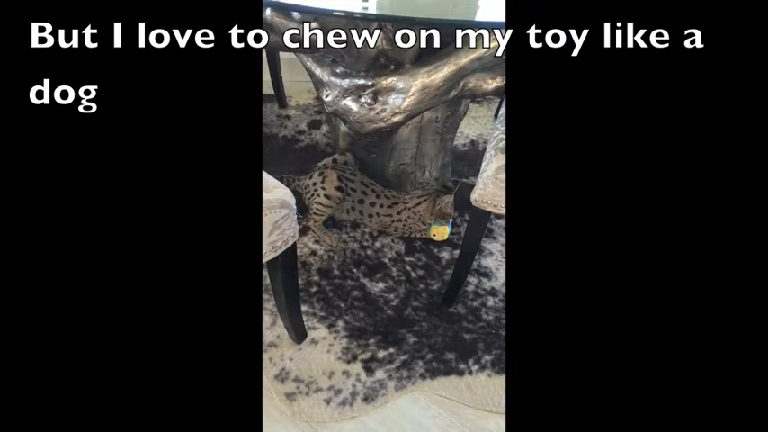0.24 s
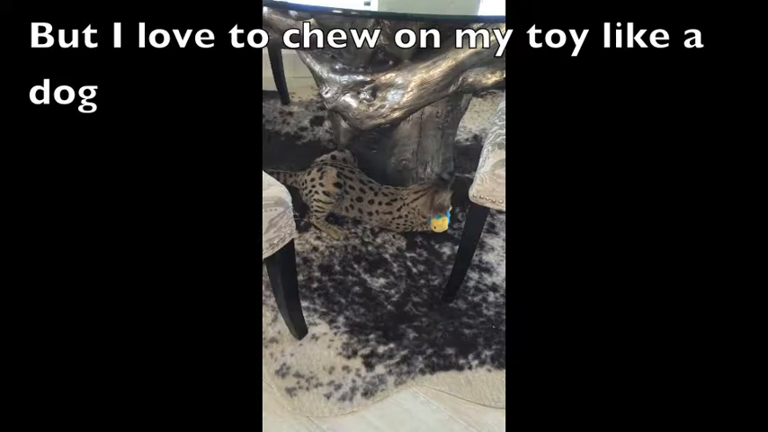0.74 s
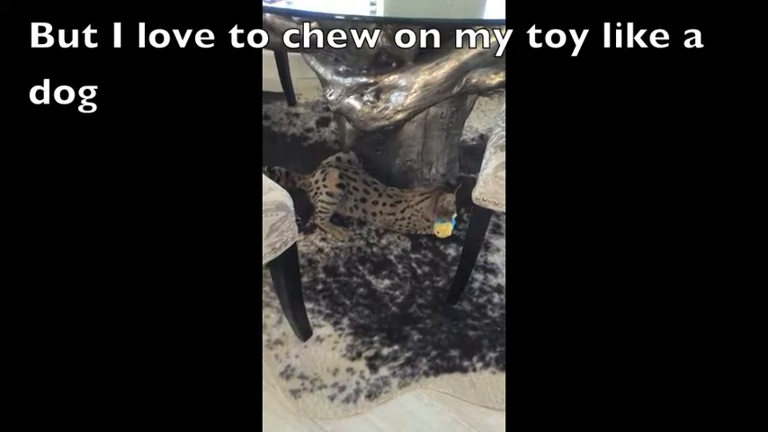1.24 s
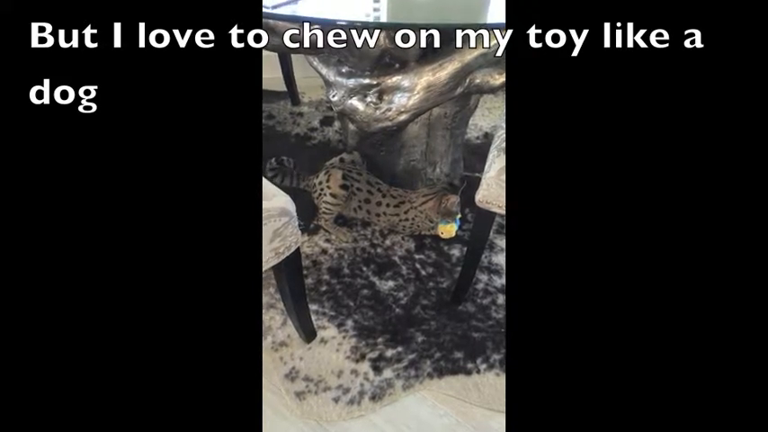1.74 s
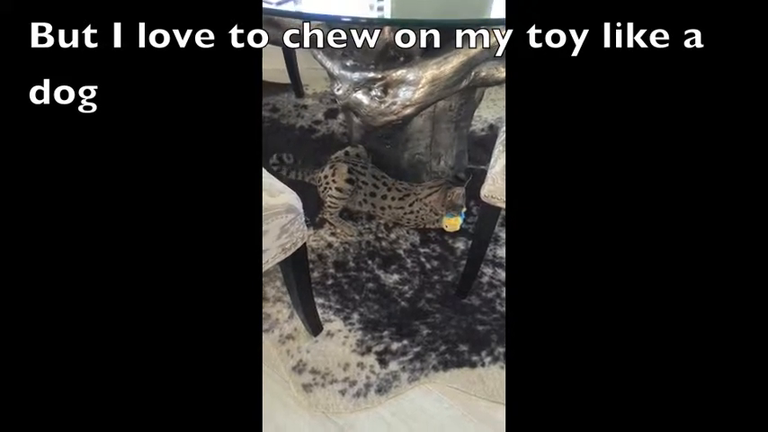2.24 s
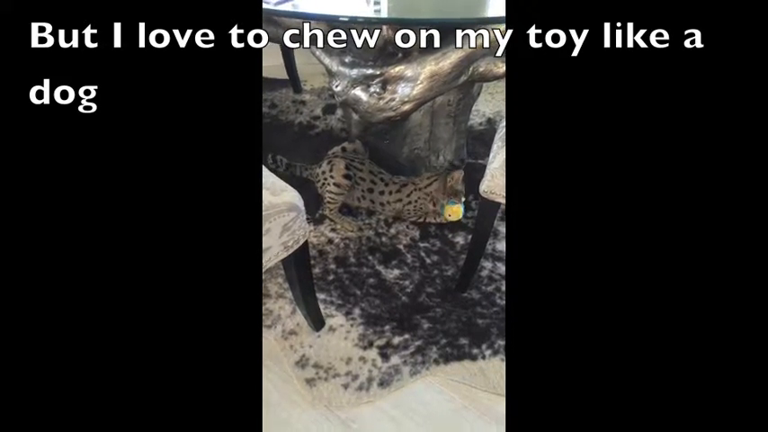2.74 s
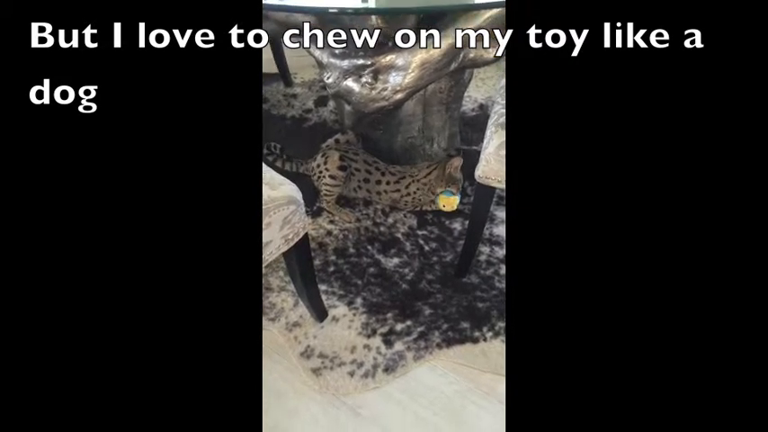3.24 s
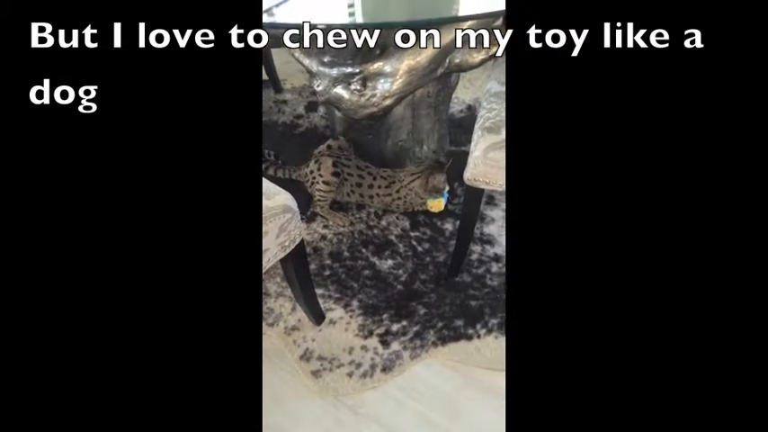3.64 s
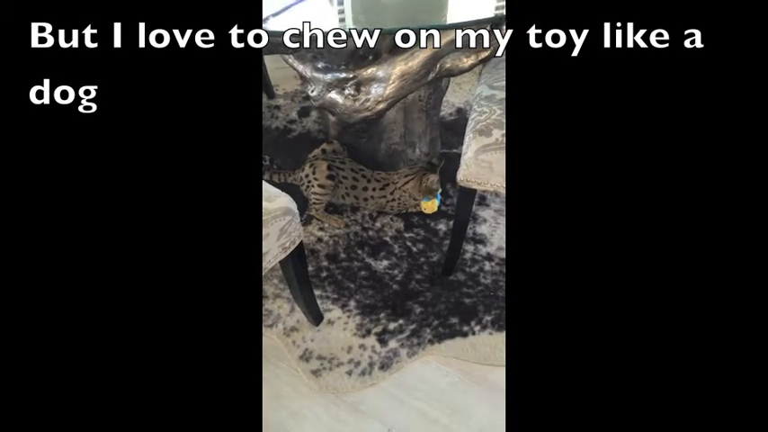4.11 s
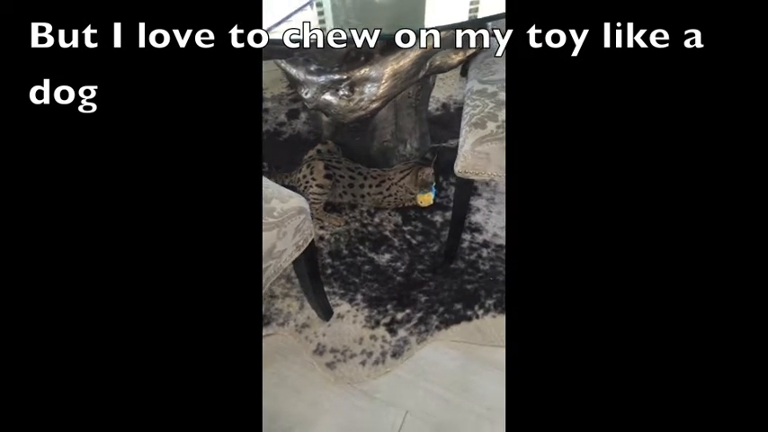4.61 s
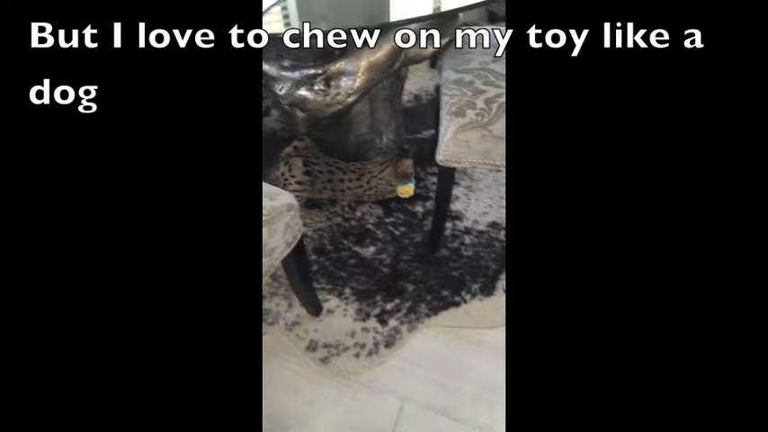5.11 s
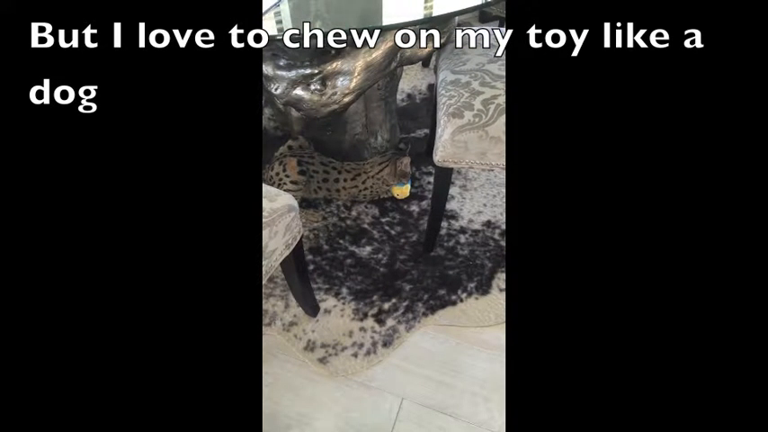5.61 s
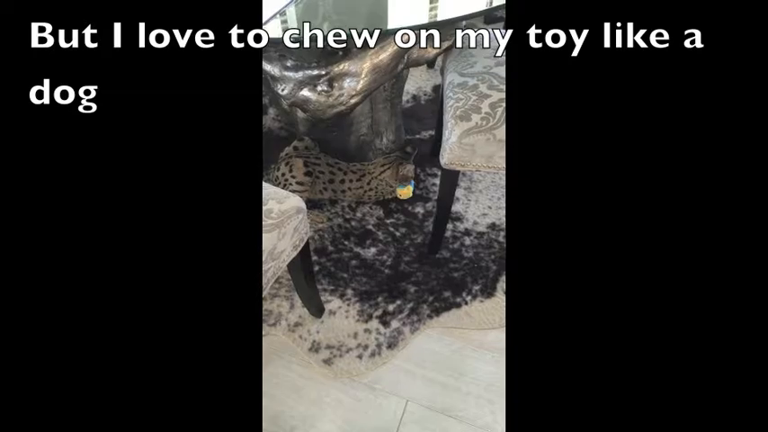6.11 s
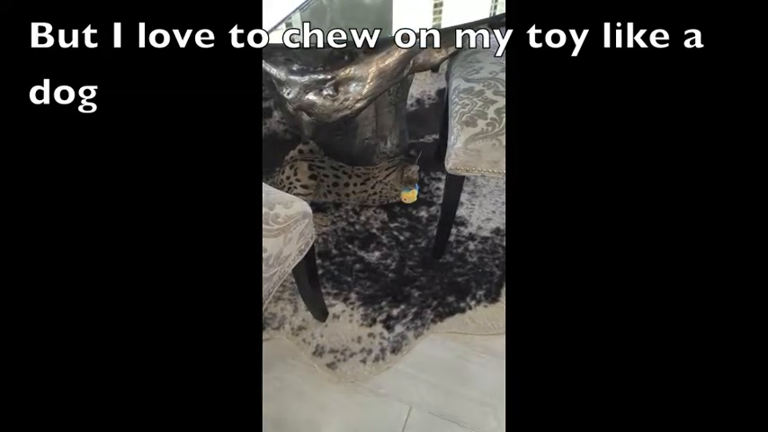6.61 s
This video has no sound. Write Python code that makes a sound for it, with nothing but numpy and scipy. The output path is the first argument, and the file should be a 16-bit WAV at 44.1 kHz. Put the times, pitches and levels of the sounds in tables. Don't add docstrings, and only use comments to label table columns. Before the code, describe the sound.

A quiet, reverberant room with a low steady appliance hum, dull rumble and light microphone hiss. A squeaky toy gives one clipped, nasal, piercing chirp, then after almost three seconds another, slightly brighter and wavering, and after a further two and a half seconds a third, a little lower and duller. Each has a short airy tail of echo. Tiny clicks and one soft low knock from the chewing cat are heard in the gaps, picked up by a phone nearby.

```python
import sys
import numpy as np
from scipy import signal
from scipy.fft import rfft, irfft
from scipy.io import wavfile
from scipy.ndimage import uniform_filter1d

SR = 44100
rng = np.random.default_rng(int(sys.argv[2]) if len(sys.argv) > 2 else 0)


def elevation(decibels):
    levels = np.asarray(decibels, float)
    return 10 ** (levels / 20)


def int16_out(signal):
    q = np.round(np.clip(np.atleast_2d(signal).T, -1, 1) * 32767)
    wavfile.write(sys.argv[1], SR, q.astype(np.int16))


N = 302523

# multiple of shaft rate, rms level/dB
HUM_PARTIALS = [(1, -68), (2, -71.5), (3, -68), (4, -76), (5, -68), (8, -86), (9, -81), (11, -77.5),
                (13, -81.5), (15, -88), (17, -87.5), (19, -87), (21, -92)]
# t/s, length/s, deep-mode level/dB, upper-mode
# level/dB
TRAFFIC_SWELLS = [
    (0.105, .15, 3.5, 4),
    (0.896, 0.2, -1.5, -2),
    (2.2, .3, 1.5, -2),
    (3.3, 0.17, -11, -2),
    (3.551, 0.18, 7.5, -1.5),
    (4.259, .04, -1, 6),
    (4.504, 0.15, 6, 4),
    (5.445, 0.23, -1, 1),
    (5.902, 0.2, 4.5, 0),
    (6.8, 0.44, 0, 1.5),
]
# f/Hz, width/Hz, level/dB
ROOM_MODES = [(59.78, 5, -64), (90.4, 25, -68.5), (165.8, 42, -68.5), (210.13, 5.64, -63.5), (247, 8, -72)]
# t/s, f/Hz, level/dB
ENGINE_TRACK = [(4.25, 76, -78), (4.45, 81.5, -65), (4.85, 94.8, -61.5), (5.1, 100, -68), (5.4, 105, -86)]
# f/Hz, level/dB (per Hz)
NOISE_SPECTRUM = [(20, -36), (33, -20.5), (40, -5.5), (50, -6), (115, -6), (140, -14), (300, -8),
                  (600, -16), (1200, -22.5), (2500, -31.5), (5000, -38), (9500, -41), (10500, -45),
                  (11500, -42.5), (15100, -45), (15350, -76)]
# start t/s, end t/s, level/dB
AIR_LEAKS = [
    (0.645, 0.662, -68),
    (3.39, 3.417, -68),
    (5.815, 5.864, -64.5),
]
# t/s, f/Hz
REED_RATES = [
    [(.6712, 1200), (.678, 1225), (.690, 1190), (.698, 1197), (.706, 1175), (.728, 1192), (.748, 1185),
     (.755, 1172)],
    [(3.4179, 1220), (3.427, 1243), (3.434, 1222), (3.443, 1231), (3.450, 1207), (3.464, 1236),
     (3.478, 1188), (3.491, 1168)],
    [(5.8514, 1184), (5.857, 1196), (5.866, 1176), (5.876, 1190), (5.882, 1186), (5.896, 1205),
     (5.906, 1186), (5.915, 1166)],
]
BITE_LEVELS = [-34.5, -33.5, -34.5]
# multiple, level/dB
REED_OVERTONES = [
    [(1, -9.5), (2, -13.5), (3, -13), (4, -13.5), (5, -9.5), (6, -3.5), (7, -4), (8, -2), (9, -10),
     (10, -12.5), (11, -12.5), (12, -25), (13, -33)],
    [(1, -10), (2, -9), (3, -13.5), (4, -10.5), (5, -7), (6, 0.5), (7, -2.5), (8, 1.5), (9, -8.5),
     (10, -9.5), (11, -16), (12, -21.5), (13, -35.5)],
    [(1, -11.5), (2, -14.5), (3, -15.5), (4, -14.5), (5, -8.5), (6, -6), (7, -5), (8, -3.5), (9, -13),
     (10, -17.5), (11, -18), (12, -35), (13, -34)],
]
# delay/s, level/dB
FLOOR_BOUNCES = [(.00035, -3), (.00035, -4), (.00035, -3)]
DIRECT_LEVELS = [-0.5, 1, -1.5]
ROOM_SENDS = [-1.5, -0.5, -1.5]
# delay/s, level/dB
EARLY_ECHOES = [(.0031, -24), (.0074, -22), (.0122, -22), (.019, -22)]
# f/Hz, t60/s
REVERB_TIMES = [(1000, 0.56), (2500, 0.75), (5000, 0.67), (8000, 0.48), (10000, 0.37), (12500, .33),
                (16000, 0.26)]
# f/Hz, level/dB
REVERB_COLOUR = [(600, 9), (1200, 7.5), (2400, 2.5), (3600, 1), (5000, -2), (7000, -5.5), (9000, -5),
                 (12000, -3.5), (16000, -6.5)]
# t/s, peak level/dB, centre f/Hz, width/Hz, t60/s
TOOTH_TAPS = [(1.035, -62, 3500, 1500, .015), (1.105, -64, 3820, 3000, .01),
              (1.158, -59, 3470, 1990, 0.013), (1.597, -60, 3950, 7000, 0.0088),
              (2.853, -58.5, 4970, 12000, 0.0073), (4.260, -52, 745, 700, 0.04),
              (4.262, -66.5, 5800, 2500, 0.1), (4.276, -61, 2200, 1500, 0.044),
              (4.418, -71, 5440, 1200, .02), (6.262, -71, 5280, 1000, 0.0099),
              (6.760, -73, 5330, 910, .012)]


def unit(x):
    return x / np.sqrt(np.mean(x ** 2))


def on_log_hz(table, hz):
    f, v = np.transpose(table)
    return np.interp(np.log(np.maximum(hz, 1)), np.log(f), v)


def colour(x, table):
    gain = elevation(on_log_hz(table, np.fft.rfftfreq(len(x), 1 / SR)))
    return irfft(rfft(x) * gain, len(x))


def resonate(x, hz, width):
    return signal.lfilter(*signal.iirpeak(hz, max(hz / width, .6), SR), x)


def resonate_twice(x, hz, width):
    return resonate(resonate(x, hz, width), hz, width)


def walk(rate, size=N):
    hold = int(SR / rate)
    steps = np.repeat(rng.standard_normal(size // hold + 1), hold)
    slewed = uniform_filter1d(uniform_filter1d(steps, hold), hold)
    return unit(slewed[:size])


def swell(s, length):
    return np.exp(-((np.arange(N) / SR - s) / length) ** 2)


def glide(hz):
    return 2 * np.pi * np.cumsum(hz) / SR


def compressor(shaft_hz=59.47, rattle_db=-80):
    turn = 2 * np.pi * shaft_hz * np.arange(N) / SR
    hum = np.zeros(N)
    for multiple, db in HUM_PARTIALS:
        level = np.sqrt(2) * elevation(db + walk(3))
        hum += level * np.sin(multiple * turn + rng.uniform(0, 2 * np.pi))
    rattle = rng.standard_normal(N) * np.exp(0.56 * np.cos(2 * turn))
    return hum + elevation(rattle_db) * unit(resonate_twice(rattle, 800, 1300))


def whine(level_db=-92.5, second_db=-5, wander_hz=6, flicker_db=2):
    warming_up = np.arange(N) / SR < 1.6
    db = level_db + 5 * swell(2.4, 0.56) - 3 * warming_up

    def tone(hz):
        return elevation(flicker_db * walk(12)) * np.sin(glide(hz + wander_hz * walk(30)))

    return np.sqrt(2) * elevation(db) * (tone(3100) + elevation(second_db) * tone(3740))


def rumble():
    swells = sum(np.outer(db, swell(s, length)) for s, length, *db in TRAFFIC_SWELLS)
    deep, upper = elevation(swells)
    modes = np.zeros(N)
    for hz, width, db in ROOM_MODES:
        mode = unit(resonate_twice(rng.standard_normal(N), hz, width))
        modes += elevation(db) * mode * (deep if hz < 130 else upper)
    t = np.arange(N) / SR
    s, hz, db = np.transpose(ENGINE_TRACK)
    engine_level = np.sqrt(2) * elevation(np.interp(t, s, db, -120, -120))
    return modes + engine_level * np.sin(glide(np.interp(t, s, hz)))


def air(level_db=-62.5):
    return elevation(level_db) * unit(colour(rng.standard_normal(N), NOISE_SPECTRUM))


def leaks():
    t = np.arange(N) / SR
    hiss = unit(resonate_twice(rng.standard_normal(N), 9200, 1800))
    envelope = np.zeros(N)
    for start, end, db in AIR_LEAKS:
        growth = elevation(np.interp(t, [start, end], [db - 12, db]))
        envelope += growth * (t > start) * (t < end)
    return hiss * envelope


def bite(squeeze, mean_db, db_per_hz=0.13):
    s, hz = np.transpose(squeeze)
    db = mean_db + db_per_hz * (hz - hz.mean())
    catch = (s[0] - .0026, hz[0] - 190, db[0] - 36)
    sag = (s[-1] + .008, hz[-1] - 50, db[-1] - 4)
    stall = (sag[0] + .006, sag[1] - 100, sag[2] - 31)
    return [catch, *zip(s, hz, db), sag, stall]


def squeak(blow, overtones, shimmer_db=.8, air_db=-45, dulling=.075):
    s, hz, db = np.transpose(blow)
    first = int(s[0] * SR)
    t = np.arange(first, int(s[-1] * SR)) / SR
    cycle = glide(np.interp(t, s, hz))
    level_db = np.interp(t, s, db)
    slack_db = dulling * (level_db - db.max())
    tones = np.zeros(len(t))
    for multiple, gain_db in overtones:
        shimmer = shimmer_db * walk(70, size=len(t))
        tone_db = gain_db + (multiple - 7) * slack_db + shimmer
        tones += elevation(tone_db) * np.sin(multiple * cycle)
    breath = resonate(rng.standard_normal(len(t)), 6300, 4700) * (1 + np.cos(cycle))
    out = np.zeros(N)
    out[first:][:len(t)] = (unit(tones) + elevation(air_db) * unit(breath)) * elevation(level_db)
    return out


def bounce(x, delay, db):
    shift = np.exp(-2j * np.pi * np.fft.rfftfreq(N, 1 / SR) * delay)
    return x + elevation(db) * irfft(rfft(x) * shift, N)


def room(x, wet_db=-10, build_s=0.0083):
    t = np.arange(SR) / SR
    tail = np.zeros(SR)
    for hz in 700 * 2 ** np.arange(0, 4.6, .5):
        edges = [hz / 2 ** .25, hz * 2 ** .25]
        half_octave = signal.butter(2, edges, "band", fs=SR, output="sos")
        band = signal.sosfilt(half_octave, rng.standard_normal(SR))
        tail += band * elevation(-60 * t / on_log_hz(REVERB_TIMES, hz))
    tail = unit(tail * (1 - np.exp(-t / build_s))) / np.sqrt(SR) * elevation(wet_db)
    for delay, db in EARLY_ECHOES:
        tail[int(delay * SR)] += elevation(db)
    return signal.fftconvolve(x, colour(tail, REVERB_COLOUR))[:N]


def ticks():
    out, t = np.zeros(N), np.arange(4000) / SR
    for s, db, hz, width, t60 in TOOTH_TAPS:
        burst = rng.standard_normal(len(t)) * elevation(-60 * t / t60)
        tap = resonate_twice(burst, hz, width)
        out[int(s * SR):][:len(t)] += elevation(db) * tap / np.abs(tap).max()
    return out


def scene():
    steady = compressor() + whine() + rumble() + air()
    mouth = leaks() + ticks()
    near, sent = mouth.copy(), mouth.copy()
    bites = zip(REED_RATES, BITE_LEVELS, REED_OVERTONES, FLOOR_BOUNCES, DIRECT_LEVELS, ROOM_SENDS)
    for squeeze, mean_db, overtones, floor, near_db, send_db in bites:
        toy = squeak(bite(squeeze, mean_db), overtones)
        near += elevation(near_db) * bounce(toy, *floor)
        sent += elevation(send_db) * toy
    return (near + room(sent) + steady)[None]


def top_cut(x):
    return signal.sosfilt(signal.butter(12, 15680, fs=SR, output="sos"), x)


def record(dry):
    top = signal.ellip(10, .2, 70, 15750, fs=SR, output="sos")
    mix = signal.sosfilt(top, dry)
    return top_cut(mix)


dry = scene()
out = record(dry)
int16_out(out)
```